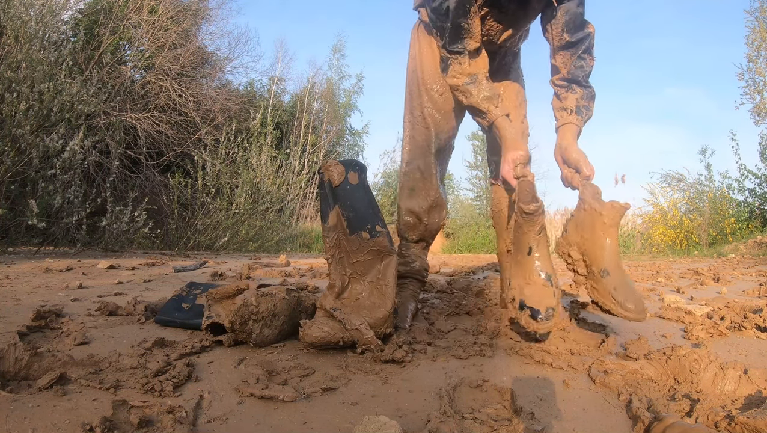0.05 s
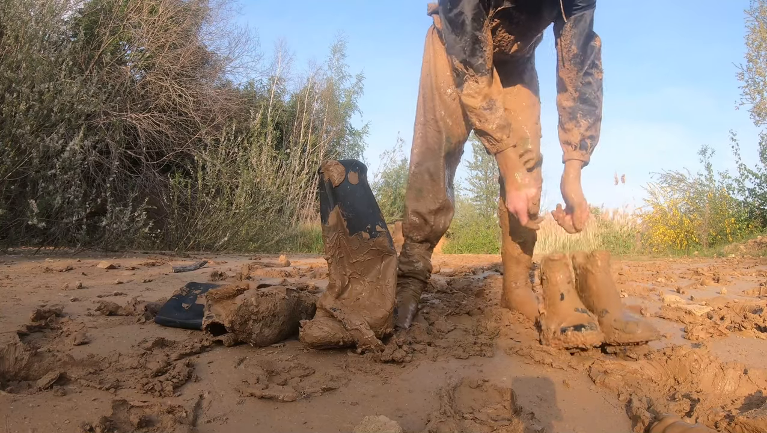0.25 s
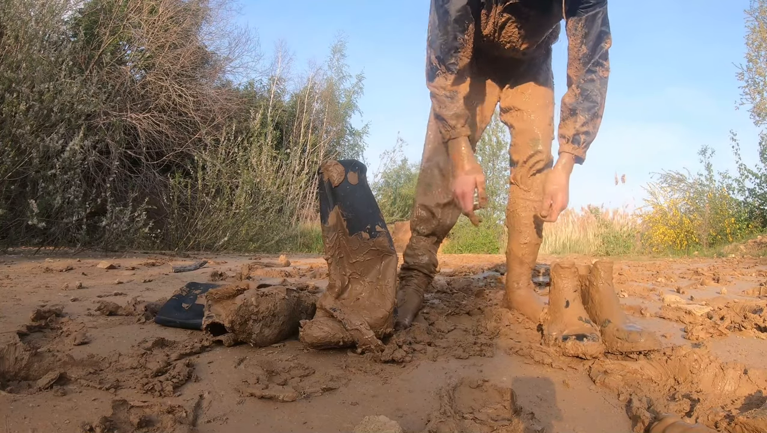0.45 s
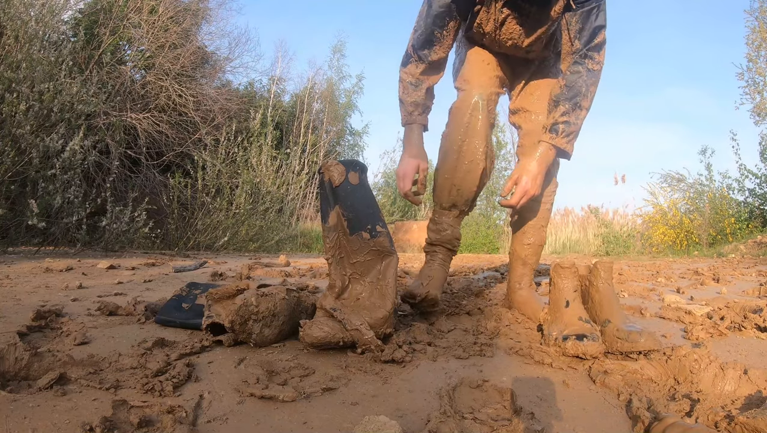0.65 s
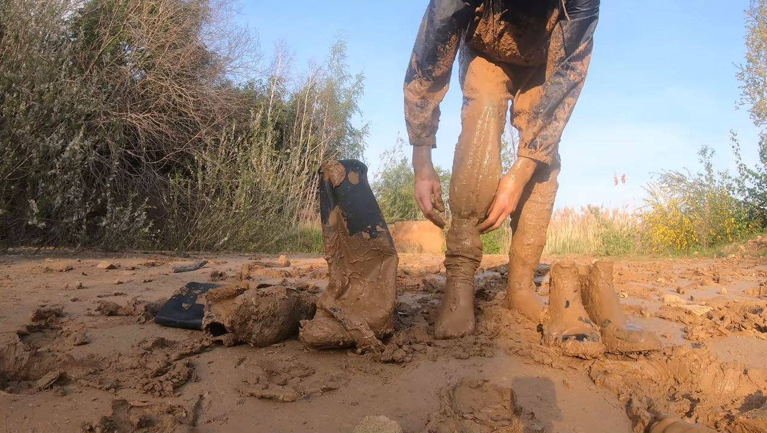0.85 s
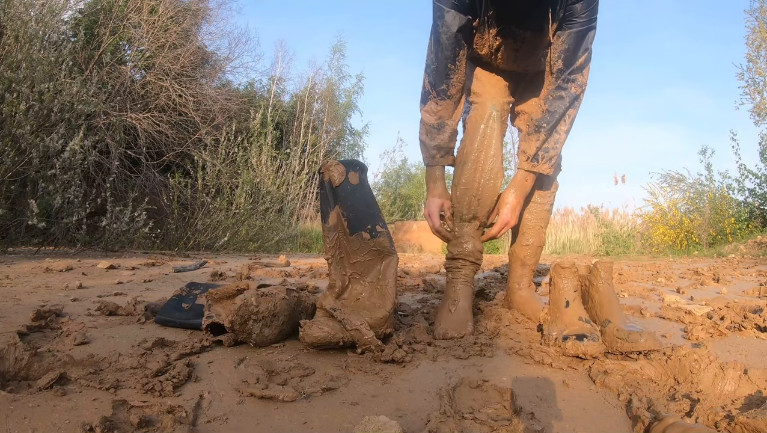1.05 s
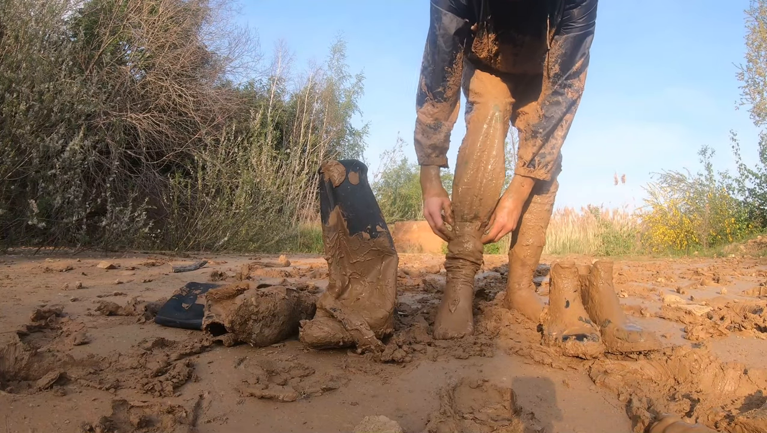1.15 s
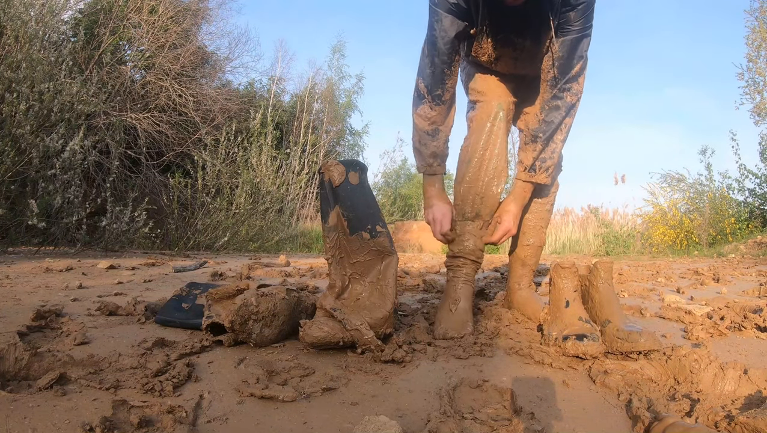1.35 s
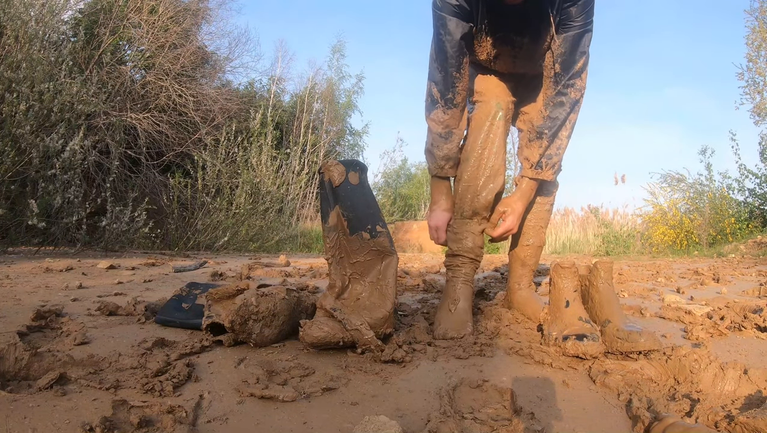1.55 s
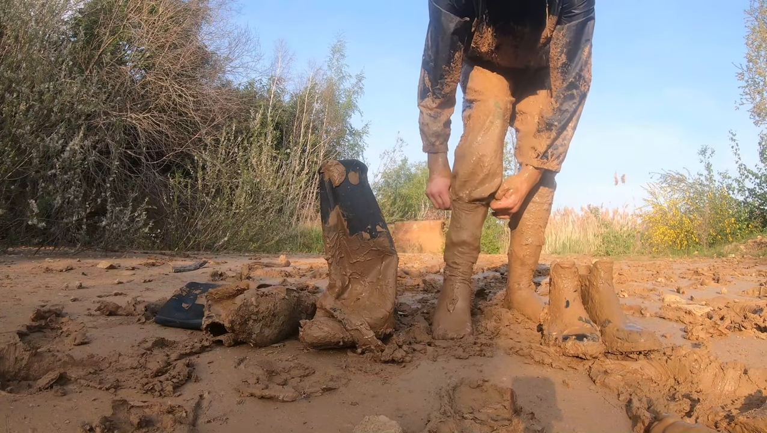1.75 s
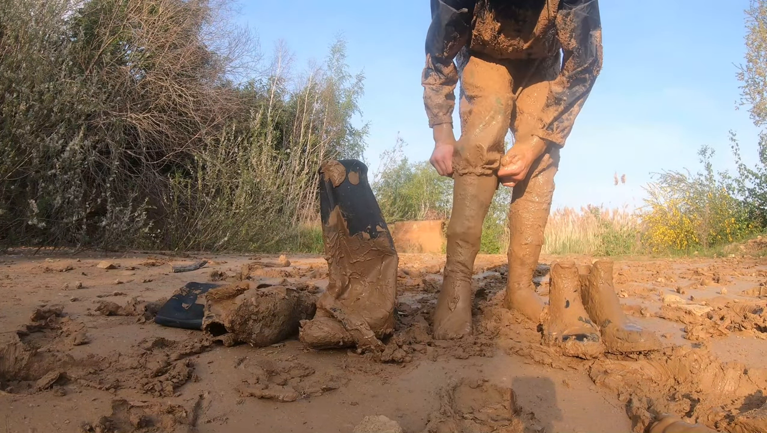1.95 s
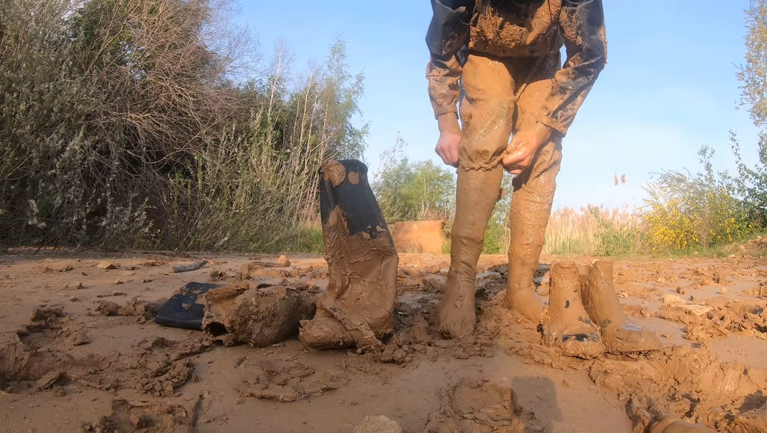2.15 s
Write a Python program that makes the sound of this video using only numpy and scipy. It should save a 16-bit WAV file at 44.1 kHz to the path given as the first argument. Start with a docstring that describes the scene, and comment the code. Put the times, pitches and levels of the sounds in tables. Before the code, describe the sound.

In a quiet quarry, a boot slaps onto wet mud nearby, giving the microphone a brief low bump. A soft squish follows, then damp legwear rustles and snaps as it is pulled up, with faint bird whistles behind.

```python
"""A faint rustle and a pop of mud come first; then a boot pats, slaps and rocks on wet quarry ground.
The impacts ring its hollow shaft and travel through the ground to shake the camera stand.
A foot settles in the mud, and wet legwear is tugged up the leg, its fibres catching, slipping, snapping.
A small bird repeats one rising whistle among echoing trees, and another chirps once.
Behind them a thin, far tone swells and fades in quiet outdoor air."""
import sys
import numpy as np
from scipy import signal
from scipy.fft import rfft, irfft
from scipy.io import wavfile

SR = 44100
rng = np.random.default_rng(int(sys.argv[2]) if len(sys.argv) > 2 else 0)


def inscribe(sig):
    """Save sig as 16-bit PCM at rate SR to the path in sys.argv[1].

    A 1-D sig is mono; a 2-D sig holds one channel per row.
    Samples are clipped to [-1, 1] before scaling.
    """
    pcm = np.round(np.clip(np.atleast_2d(sig).T, -1, 1) * 32767)
    wavfile.write(sys.argv[1], SR, pcm.astype(np.int16))


N = 97020
T = np.arange(N) / SR

# spectrum of the outdoor air: frequency_hz, gain_db
AIR_SPECTRUM = [(15, -23), (25, -13), (96, -15), (182, 3), (500, -18.5), (741, -9.5), (1160, -16),
                (2250, -24), (3830, -22.5), (6500, -31.5), (9920, -33), (14000, -72)]
# left-right likeness of the air: frequency_hz, correlation
AIR_CORRELATION = [(60, 0.86), (290, 0.71), (630, 0), (1400, 0), (6000, 0.4), (14000, 0.059)]
# envelope of the rubbing cloth: time_s, level_db
RUB_ENVELOPE = [(0, -72.5), (.12, -74.5), (.21, -57.5), (.29, -67.5), (.35, -54), (.45, -65.5), (.55, -57),
                (.74, -65), (.82, -66.5), (.94, -70), (1.02, -64.5), (1.3, -69.5), (1.5, -59), (1.6, -71.5),
                (1.7, -63), (1.86, -52), (1.98, -54), (2.06, -53), (2.13, -54), (2.2, -60.5)]
# spectrum of the rubbing: frequency_hz, gain_db
RUB_SPECTRUM = [(80, -58), (220, 2.5), (500, -3), (1100, -4.5), (1700, 4), (2200, -1.5), (3600, -2),
                (4800, -6.5), (7000, -8.5), (9300, -20), (10500, -17), (14000, -44.5)]
# left-right likeness of the cloth: frequency_hz, correlation
CLOTH_CORRELATION = [(100, 0.73), (300, 0.68), (630, 0), (1400, 0.33), (3000, 0.95), (6500, 0.36),
                     (14000, 0.16)]
# envelope of the cloth dragging over the calf: time_s, level_db
DRAG_ENVELOPE = [(1.68, -80), (1.77, -62), (1.82, -54), (1.86, -55), (1.9, -66), (1.98, -78)]
# spectrum of the drag: frequency_hz, gain_db
DRAG_SPECTRUM = [(700, -25), (1300, 7), (1800, 11), (2600, 12.5), (3300, 4), (6000, -23)]
# bird calls, the first heard only as an echo: start_s, level_db
BIRD_CALLS = [(-.35, -50.5), (0.508, -59.5), (1.331, -59)]
# contour of one call: offset_s, pitch_hz, level_db
CALL_CONTOUR = [(0, 3250, -12), (0.03, 3330, -2), (0.044, 3600, 5), (.058, 3880, 4), (.085, 3930, 3),
                (.112, 3760, 1), (.138, 3600, -3), (.152, 3550, -25)]
# mud pops and drips: start_s, level_db, centre_hz, bandwidth_hz, decay_s, pan_db
MUD_POPS = [(0.168, -51.5, 950, 695, 0.004, -2), (0.377, -42, 1440, 300, 0.0038, -0.5),
            (.392, -49, 580, 443, 0.0047, -5), (0.379, -46.5, 4800, 6050, 0.0015, -7),
            (0.389, -47, 1370, 280, 0.0012, 5), (.429, -46.5, 1320, 276, 0.0023, -1),
            (0.484, -45, 950, 695, 0.00098, -7), (0.548, -53.5, 8060, 4000, 0.0024, -1),
            (0.559, -48.5, 6800, 2980, 0.0023, -6), (0.6973, -48, 6900, 2280, 0.0033, -0.5),
            (.763, -49.5, 1180, 700, 0.0025, -8.5), (.7635, -53.5, 2220, 910, 0.004, -6),
            (.862, -59.5, 2830, 1200, 0.028, -2), (.875, -47, 437, 496, 0.0011, -6),
            (1.318, -57.5, 6800, 6100, 0.0018, 2), (1.873, -50, 8600, 4000, 0.0022, -1),
            (2.151, -49.5, 950, 500, 0.0034, 0), (2.192, -44, 830, 480, 0.0037, -5)]
# soft contacts of boot, foot and cloth: start_s, squish_db, rise_s, decay_s, thump_db, thump_hz
SOFT_CONTACTS = [(0.23, -45, 0.0026, 0.017, -36, 285), (.615, -87, 0.016, 0.01, -48.5, 293),
                 (.853, -55, 0.013, 0.035, -53, 390), (1.516, -83, 0.0066, 0.015, -51.5, 274),
                 (1.956, -76, .005, 0.011, -52.5, 233), (2.084, -54.5, 0.0068, 0.0072, -53.5, 290)]
# spectrum of a squish: frequency_hz, gain_db
SQUISH_SPECTRUM = [(70, -84), (150, -9.5), (350, 4.5), (680, 3), (1100, -8.5), (2000, -13), (3200, -8.5),
                   (6500, -11), (10000, -15), (14000, -35)]
# jolts that reach the stand through the ground: start_s, level_db, length_s
GROUND_JOLTS = [(0.243, -23.5, 0.0031), (0.324, -3, 0.0018), (.340, -1.5, 0.00089), (.378, -4, 0.0026),
                (0.392, 2.5, 0.0014), (0.431, -1.5, 0.0016), (.536, -11.5, 0.0025), (.572, -9, 0.0013),
                (0.616, -10, 0.0032), (0.922, -16.5, 0.021), (1.027, -15.5, 0.019)]
# modes of the stand: frequency_hz, left_db, right_db, t60_s
STAND_MODES = [(26.2, -45.5, -36, 0.66), (54, -38, -31, 0.18), (75.1, -79, -39, 0.37),
               (99, -30.5, -31.5, 0.31), (151.7, -45, -31.5, 0.26), (169, -39, -31, 0.23),
               (269.8, -39.5, -39, 0.31), (356, -26.5, -24.5, 0.024)]
# impacts of the sole on mud: start_s, level_db, spatter_relative_db, spatter_decay_s
SOLE_IMPACTS = [(.3135, -43, 4, .004), (.3184, -25, -14, .002), (.3245, -14, -6.5, .0033),
                (.3290, -24, -6, .0035), (.3322, -29, -7, .004)]
# spectrum of the sole's clap: frequency_hz, gain_db
CLAP_SPECTRUM = [(70, 14), (160, -3.5), (690, 0), (950, -1), (1300, -1.5), (1900, -2.5), (2600, 7.5),
                 (6000, -19), (14000, -51)]
# spectrum of thrown mud: frequency_hz, gain_db
SPATTER_SPECTRUM = [(170, 4.5), (680, -15), (980, -3), (1350, -0.5), (2700, 7), (4400, -3.5), (5400, -12),
                    (9600, -12.5), (14000, -31)]
# modes of the boot's hollow shaft: frequency_hz, relative_to_clap_db, t60_s
SHAFT_MODES = [(480, -27, .03), (660, -23, .045), (1250, -29, .035), (1520, -29, .03)]
# envelope of the far tone: time_s, level_db
FAR_TONE_ENVELOPE = [(.45, -94), (.6, -68.5), (.78, -65.5), (.92, -85), (1.1, -59.5), (1.2, -66.5),
                     (1.3, -75.5), (1.88, -98), (1.96, -64.5), (2.2, -56.5)]
# snaps of stretched legwear: start_s, level_db, pitch_hz
CLOTH_SNAPS = [(1.8425, -30.5, 2120), (1.8461, -40, 2600), (1.8493, -26, 2456), (1.8571, -32.5, 2410),
               (1.8605, -43, 2190), (1.9424, -38, 2550), (2.024, -45.5, 3530)]
# the second bird's chirp: start_s, length_s, from_hz, to_hz, level_db
FALLING_CHIRP = (2.153, .036, 7200, 5400, -59)
# phase difference of near sounds at the two microphone ports: frequency_hz, right_lead_rad
PORT_PHASE = [(1200, .2), (2200, -.15), (5500, .45), (7400, 1.2), (9000, 2.1), (14000, 2)]


def amp(db):
    """Amplitude grows tenfold for every 20 dB."""
    return 10 ** (np.asarray(db) / 20)


def unit_rms(x):
    """Dividing by the rms gives unit mean power."""
    return x / np.sqrt(np.mean(x ** 2) + 1e-20)


def at_frequency(points, hz):
    """Interpolation on a logarithmic frequency axis."""
    knots_hz, values = np.transpose(points)
    return np.interp(np.log(hz + 1), np.log(knots_hz), values)


def envelope(points):
    """Straight lines in decibels give exponential swells and fades."""
    return amp(np.interp(T, *np.transpose(points)))


def pan(db):
    """A level difference, left minus right, places a source to one side."""
    return amp([[db / 2], [-db / 2]])


def add(mix, start_s, sound):
    """Superposition: a stereo sound adds to the mix from its start time."""
    at = round(start_s * SR)
    sound = sound[:, max(-at, 0):]
    part = mix[:, max(at, 0):][:, :sound.shape[1]]
    part += sound[:, :part.shape[1]]


def impulse_response(spectrum, size=2048):
    """The Hilbert transform of log gain gives the phase of a causal response, here of unit energy."""
    log_gain = np.log(amp(at_frequency(spectrum, abs(np.fft.fftfreq(size, 1 / SR)))))
    response = np.fft.ifft(np.exp(np.conj(signal.hilbert(log_gain)))).real[:size // 2]
    return response / np.linalg.norm(response)


def convolve(x, response):
    """A linear system convolves its input with its impulse response."""
    return signal.fftconvolve(x, np.atleast_2d(response), axes=1)[:, :x.shape[1]]


def correlate(pair, correlation):
    """A shared component makes two independent channels partly alike."""
    shared = np.clip(correlation, -1, 1)
    return np.array([pair[0], shared * pair[0] + np.sqrt(1 - shared ** 2) * pair[1]])


def noise(size, correlation=0):
    """White noise has a flat mean spectrum; correlation narrows its stereo image."""
    return correlate(rng.standard_normal((2, size)), correlation)


def shaped(x, spectrum, correlation):
    """Weighting each frequency sets the colour and width of a noise, at unit rms."""
    hz = np.fft.rfftfreq(N, 1 / SR)
    bins = correlate(rfft(x), at_frequency(correlation, hz))
    return unit_rms(irfft(bins * amp(at_frequency(spectrum, hz)), N))


def wander(rate_hz):
    """Low-passed noise fluctuates mostly below its corner frequency."""
    rolloff = (1 + (np.fft.rfftfreq(N, 1 / SR) / rate_hz) ** 2) ** 2
    return unit_rms(irfft(rfft(rng.standard_normal(N)) / rolloff, N))


def damping(t, t60_s):
    """Exponential decay loses 60 dB in each t60."""
    return np.exp(-np.log(1000) * t / t60_s)


def echoes(t60_s, build_s):
    """Diffuse reverberation: scattered reflections build up and die away."""
    tail = noise(SR) * (1 - np.exp(-T[:SR] / build_s)) * damping(T[:SR], t60_s)
    return tail / np.linalg.norm(tail[0])


def air(level_db=-63, swell_db=.6):
    """Ambient noise: a broad, gently swelling spectrum whose low peak is heard as a distant hum."""
    swell = amp(swell_db * wander(rate_hz=4))
    return shaped(noise(N), AIR_SPECTRUM, AIR_CORRELATION) * amp(level_db) * swell * pan(-1)


def cloth_rustle(slips_per_s=1300, spread_db=4, click_share=.51, flutter_db=1.16):
    """Stick-slip friction: wet fibres release in dense clicks, and the drag over the calf adds a rasp."""
    strength = amp(spread_db * np.minimum(rng.exponential(1, (2, N)), 5))
    slipping = rng.random((2, N)) < slips_per_s / SR
    clicks = strength * slipping * rng.choice([-1, 1], (2, N))
    friction = click_share * unit_rms(clicks) + (1 - click_share) * noise(N)
    rub = shaped(friction, RUB_SPECTRUM, CLOTH_CORRELATION) * envelope(RUB_ENVELOPE)
    drag = shaped(noise(N), DRAG_SPECTRUM, CLOTH_CORRELATION) * envelope(DRAG_ENVELOPE)
    return (rub + drag) * amp(flutter_db * wander(rate_hz=47)) * pan(-2)


def bird_whistle(rough_after_s=.056, warble_depth=.036, upper_ratio=1.14, upper_db=-3):
    """Random frequency modulation roughens a rising whistle as a second voice joins; trees echo both."""
    out, t = np.zeros((2, N)), T[:SR]
    offset_s, pitch_hz, contour_db = np.transpose(CALL_CONTOUR)
    pitch = np.interp(t, offset_s, pitch_hz)
    loudness = amp(np.interp(t, offset_s, contour_db)) * (t < offset_s[-1])
    roughness = np.clip((t - rough_after_s) / .01, 0, 1)
    for start_s, level_db in BIRD_CALLS:
        call = np.zeros(SR)
        for ratio, gain in (1, 1), (upper_ratio, amp(upper_db) * roughness):
            warble = 1 + warble_depth * roughness * wander(rate_hz=130)[:SR]
            call += loudness * gain * np.sin(2 * np.pi * np.cumsum(ratio * pitch * warble) / SR)
        trees = convolve(echoes(t60_s=.47, build_s=.025), call)
        add(out, start_s, amp(level_db) * (.8 * call + 2 * trees))
    return out * pan(4)


def mud_pops(size=2048, spray_gain=.42):
    """Impulse excitation: a pocket of mud bursts, and its click and spray ring one broad resonance."""
    out, t = np.zeros((2, N)), T[:size]
    for start_s, level_db, centre_hz, bandwidth_hz, decay_s, pan_db in MUD_POPS:
        burst = spray_gain * noise(size, correlation=.33) * np.exp(-t / decay_s)
        burst[:, 0] += 1  # the click
        resonance = t * np.exp(-np.pi * bandwidth_hz * t) * np.sin(2 * np.pi * centre_hz * t)
        pop = convolve(burst, resonance)
        rms_over_decay = np.sqrt(np.mean(pop ** 2) * t[-1] / decay_s)
        add(out, start_s, amp(level_db) * pan(pan_db) * pop / rms_over_decay)
    return out


def soft_pats(size=8192, thump_rise_s=.004, thump_lag_s=.0065):
    """Cushioned impact: each contact gives a grainy squish and a heavily damped, hollow thump."""
    out, t, response = np.zeros((2, N)), T[:size], impulse_response(SQUISH_SPECTRUM)
    for start_s, squish_db, rise_s, decay_s, thump_db, thump_hz in SOFT_CONTACTS:
        grains = noise(size, correlation=.78) * unit_rms(rng.exponential(1, size))
        contact = np.minimum(t / rise_s, 1) * np.exp(-np.maximum(t - rise_s, 0) / decay_s)
        squish = convolve(grains * contact, response)
        age = np.maximum(t - thump_lag_s, 0) / thump_rise_s
        thump = age * np.exp(1 - age) * np.sin(2 * np.pi * thump_hz * t)
        add(out, start_s, amp(squish_db) * squish + amp(thump_db) * thump)
    return out * pan(-1.5)


def camera_stand(size=2048, rise_s=.0049, skew_rad=1.63):
    """Modal vibration: short jolts ring the stand's low modes, while slow pushes only sway it."""
    force = np.zeros((2, N))
    for start_s, level_db, length_s in GROUND_JOLTS:
        push = np.sin(np.pi * np.minimum(T[:size] / length_s, 1)) ** 2
        add(force, start_s, amp(level_db) * np.ones((2, 1)) * push / push.sum())
    phase = np.array([[0], [skew_rad]])  # the two microphones feel the shaking out of step
    modes = sum(amp([[left_db], [right_db]]) * damping(T, t60_s) * np.cos(2 * np.pi * hz * T + phase)
                for hz, left_db, right_db, t60_s in STAND_MODES)
    return convolve(force, modes * (1 - np.exp(-T / rise_s)))


def boot_slaps(size=4096, rebound_s=.001044, rebound_share=.68, cushion_s=.00006, spatter_rise_s=.001):
    """Impact and cavity resonance: each clap of the sole rings the hollow shaft and throws a spatter."""
    out, t, hz = np.zeros((2, N)), T[:size], np.fft.rfftfreq(size, 1 / SR)
    rebound = 1 - rebound_share * np.exp(-2j * np.pi * hz * rebound_s)  # the sole springs back
    cushion = 1 / (1 + 2j * np.pi * hz * cushion_s)  # mud softens the treble
    clap = irfft(rfft(impulse_response(CLAP_SPECTRUM), size) * rebound * cushion, size)
    shaft = sum(amp(db) * damping(t, t60_s) * np.sin(2 * np.pi * mode_hz * t)
                for mode_hz, db, t60_s in SHAFT_MODES)
    slap = clap / abs(clap).max() + shaft
    wet_response = impulse_response(SPATTER_SPECTRUM)
    for start_s, level_db, spatter_db, decay_s in SOLE_IMPACTS:
        spray = noise(size, correlation=.46) * np.minimum(t / spatter_rise_s, 1) * np.exp(-t / decay_s)
        add(out, start_s, amp(level_db) * (slap + amp(spatter_db) * convolve(spray, wet_response)))
    return out * pan(-4)


def far_tone(pitch_hz=1693, bandwidth_hz=115):
    """Spectral broadening: distance blurs a high tone into a narrow, wavering band."""
    detuning = 2 * (np.fft.rfftfreq(N, 1 / SR) - pitch_hz) / bandwidth_hz
    band = irfft(rfft(noise(N, correlation=.48)) / (1 + detuning ** 2), N)
    return unit_rms(band) * envelope(FAR_TONE_ENVELOPE)


def cloth_snaps(size=1024, rise_s=.00049, fizz_db=-16.5, fizz_decay_s=.0075):
    """Elastic release: stretched cloth lets go in jerks of a few cycles, each with a little fizz."""
    out, t, response = np.zeros((2, N)), T[:size], impulse_response(RUB_SPECTRUM)
    age = t / rise_s
    for start_s, level_db, pitch_hz in CLOTH_SNAPS:
        jerk = age * np.exp(1 - age) * np.sin(2 * np.pi * pitch_hz * t)
        fizz = convolve(noise(size, correlation=.91) * np.exp(-t / fizz_decay_s), response)
        add(out, start_s, amp(level_db) * (jerk + amp(fizz_db) * fizz))
    return out * pan(-3.5)


def bird_chirp():
    """A linear frequency sweep: the second bird's thin tone falls under a half-sine envelope."""
    start_s, length_s, from_hz, to_hz, level_db = FALLING_CHIRP
    progress = np.clip((T - start_s) / length_s, 0, 1)
    phase = 2 * np.pi * np.cumsum(from_hz + (to_hz - from_hz) * progress) / SR
    return amp(level_db) * np.sin(np.pi * progress) * np.sin(phase) * pan(1)


def microphone_ports(x):
    """Phase difference: the two ports receive near sounds out of step, most of all in the treble."""
    lead_rad = at_frequency(PORT_PHASE, np.fft.rfftfreq(N, 1 / SR))
    return irfft(rfft(x) * np.exp(1j * lead_rad * np.array([[-.5], [.5]])), N)


def scene():
    """Superposition of the near sounds, their faint quarry echo, the stand and the distant sources."""
    near = microphone_ports(boot_slaps() + soft_pats() + mud_pops() + cloth_rustle() + cloth_snaps())
    quarry = amp(-24) * convolve(near, echoes(t60_s=.2, build_s=.003))
    return near + quarry + camera_stand() + bird_whistle() + bird_chirp() + far_tone() + air()


def record(dry):
    """Band limiting: a linear-phase low-pass filter removes the highest treble."""
    cutoff_hz = 14400
    low_pass = signal.firwin(255, cutoff_hz, window=("kaiser", 9), fs=SR)
    return signal.oaconvolve(dry, low_pass[None], "same")


dry = scene()
out = record(dry)
inscribe(out)
```